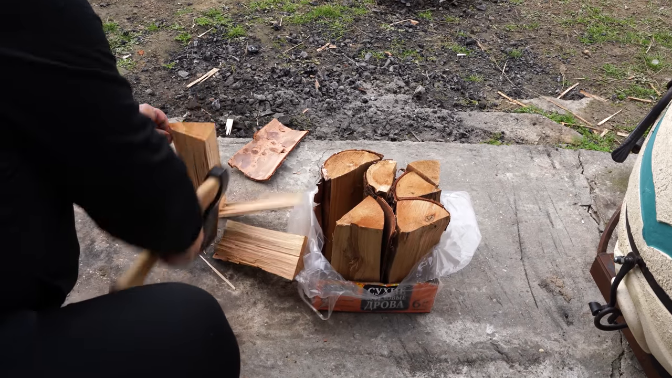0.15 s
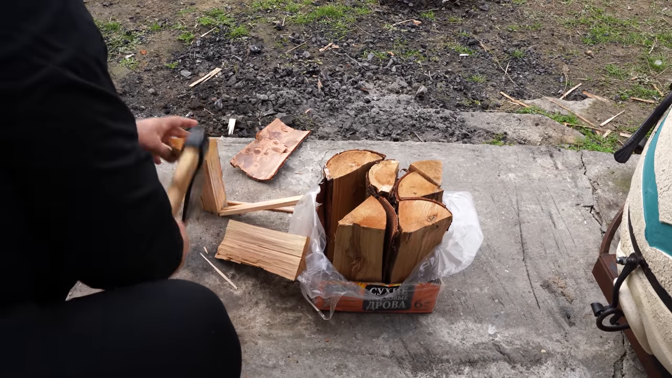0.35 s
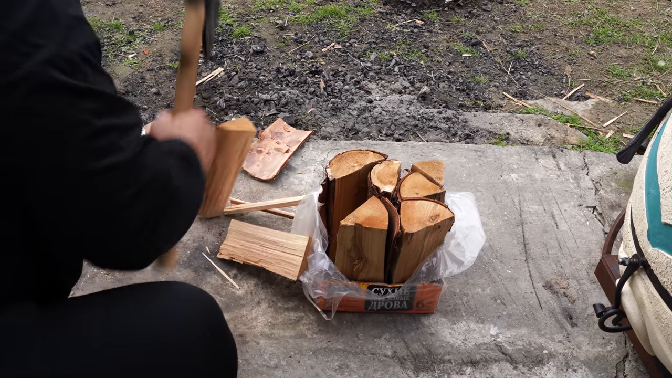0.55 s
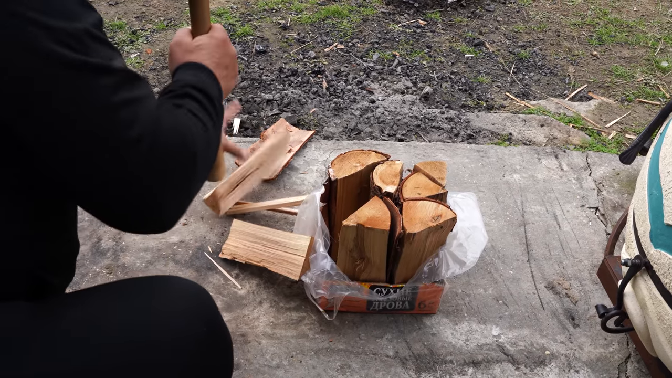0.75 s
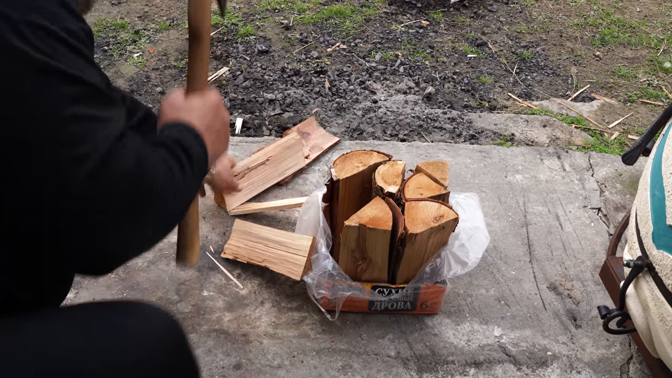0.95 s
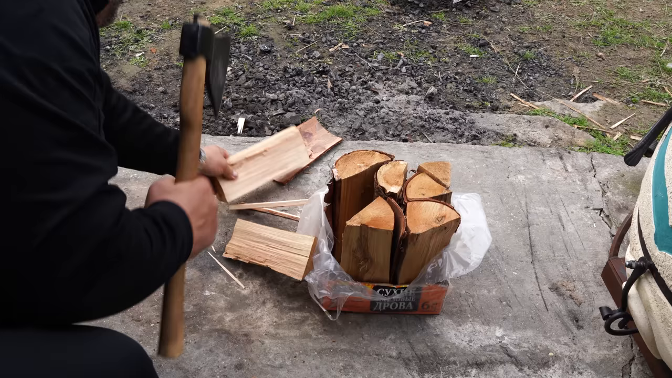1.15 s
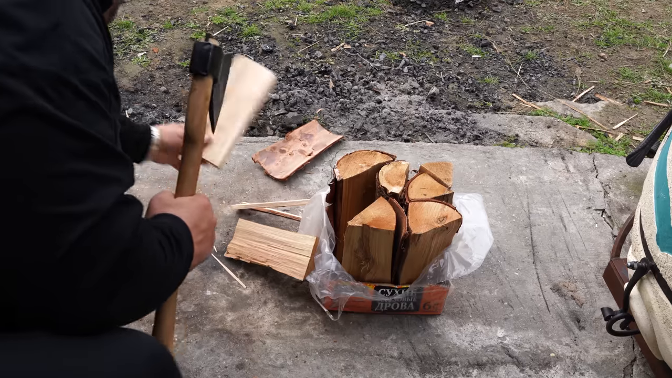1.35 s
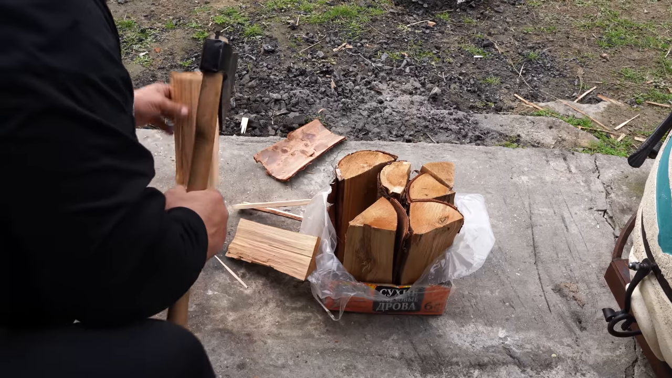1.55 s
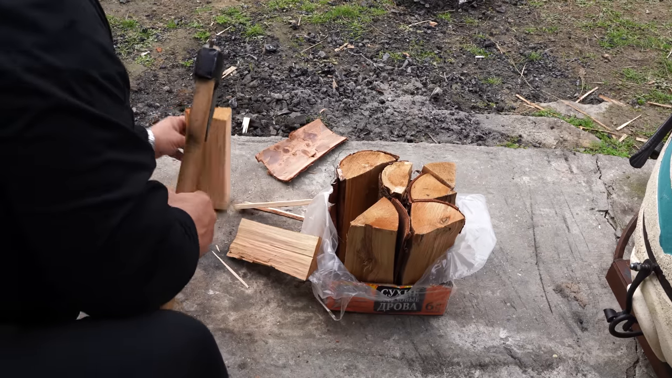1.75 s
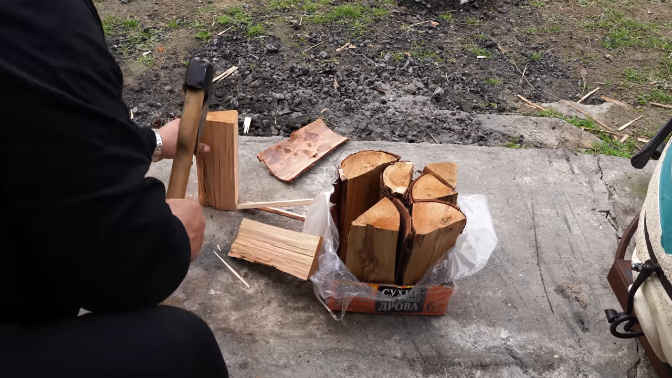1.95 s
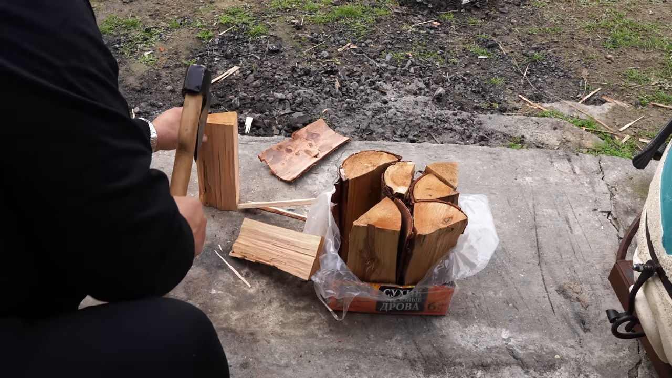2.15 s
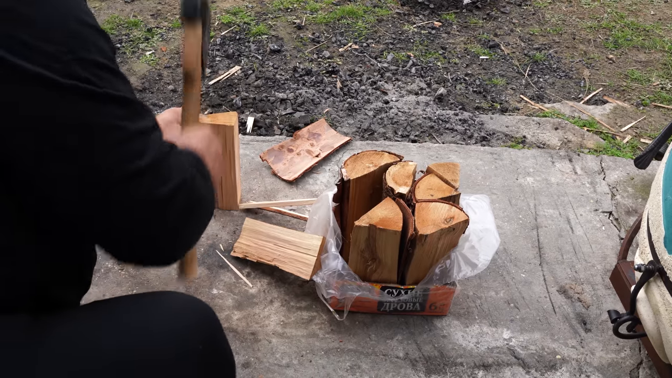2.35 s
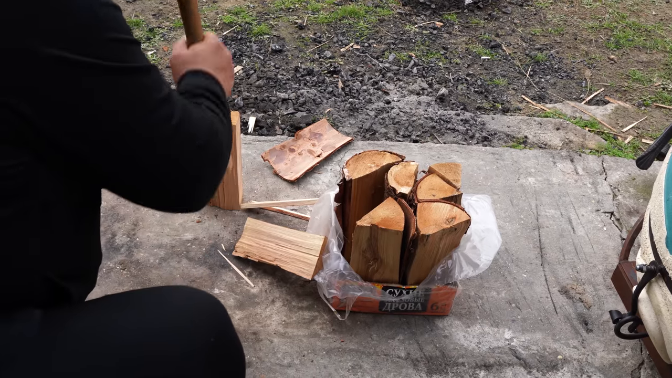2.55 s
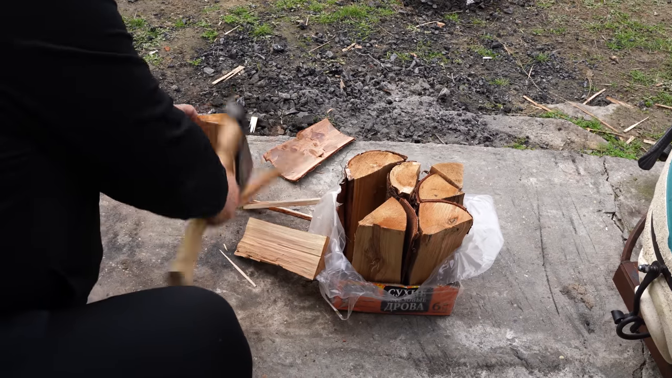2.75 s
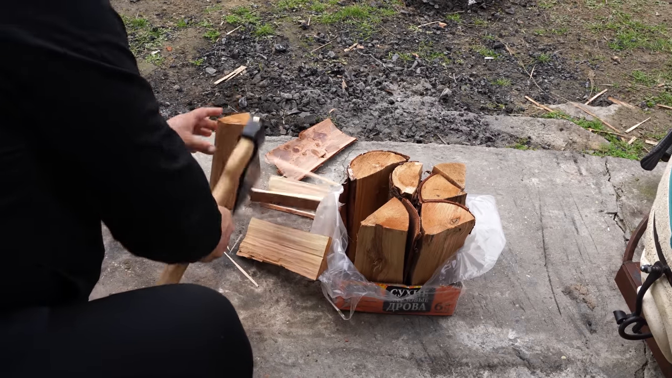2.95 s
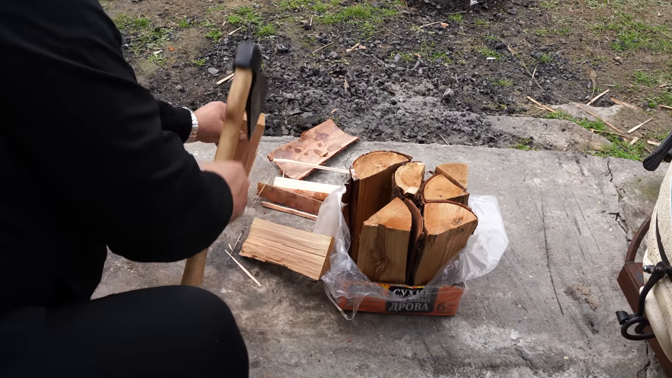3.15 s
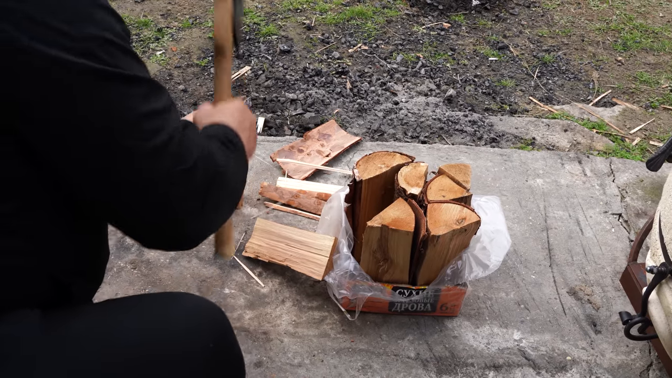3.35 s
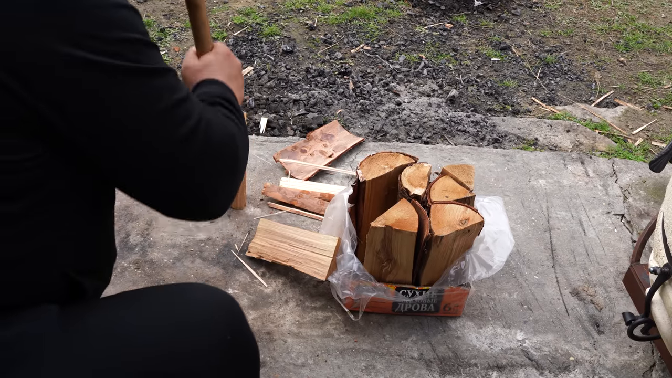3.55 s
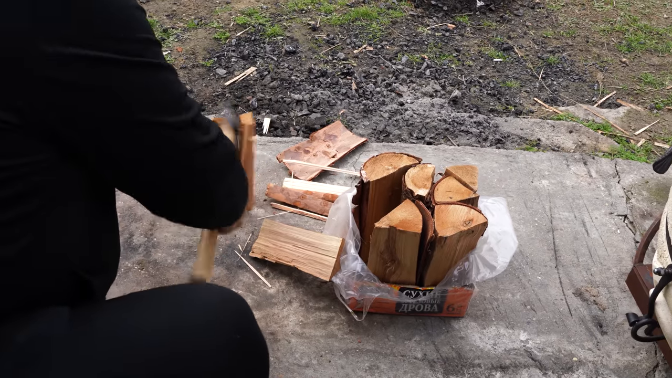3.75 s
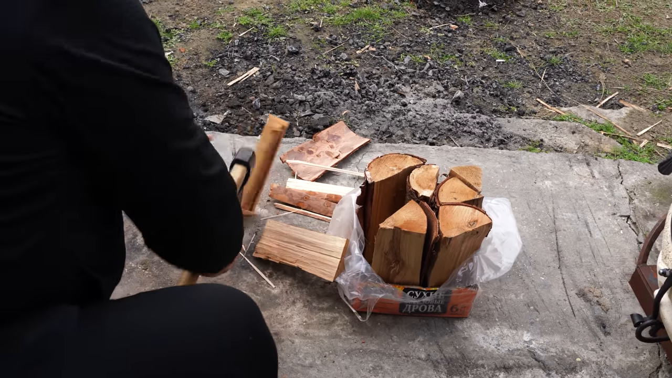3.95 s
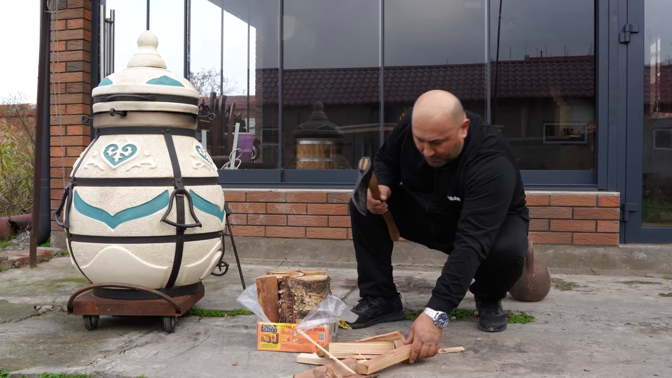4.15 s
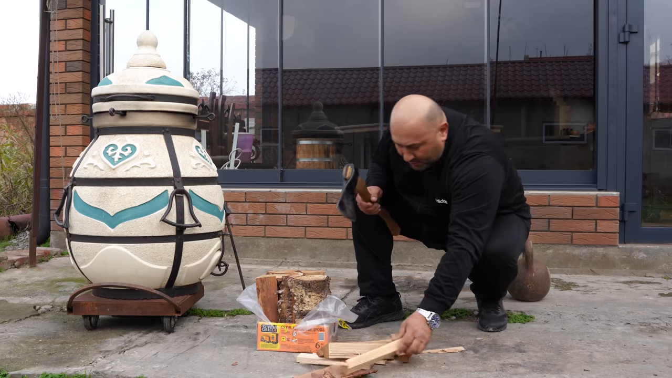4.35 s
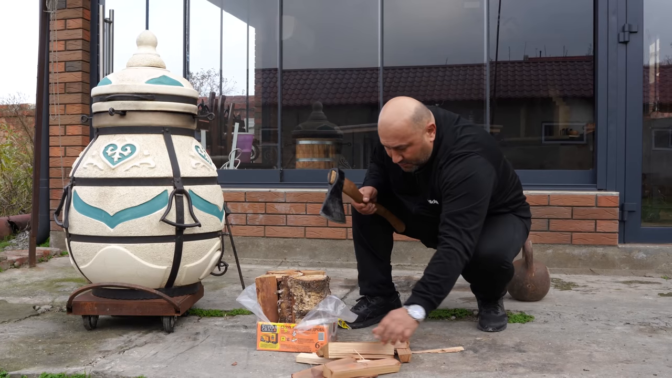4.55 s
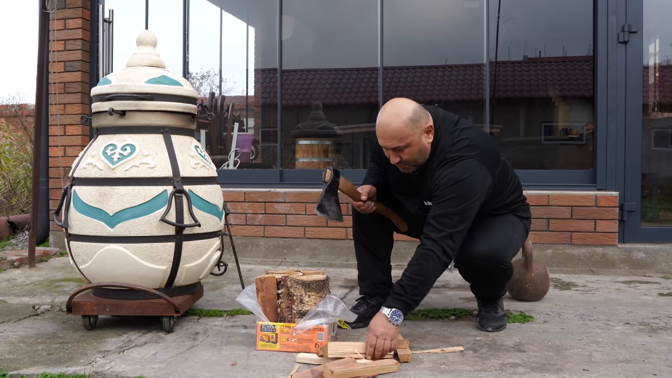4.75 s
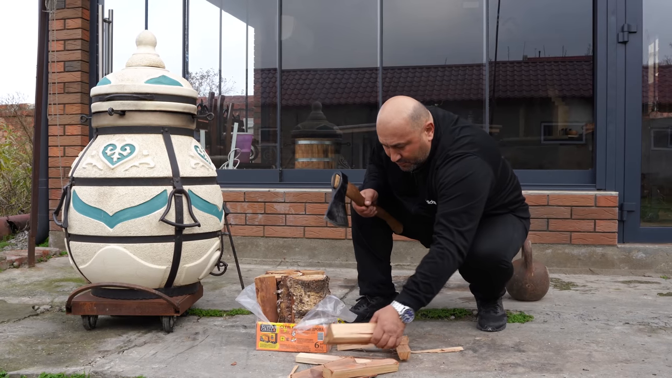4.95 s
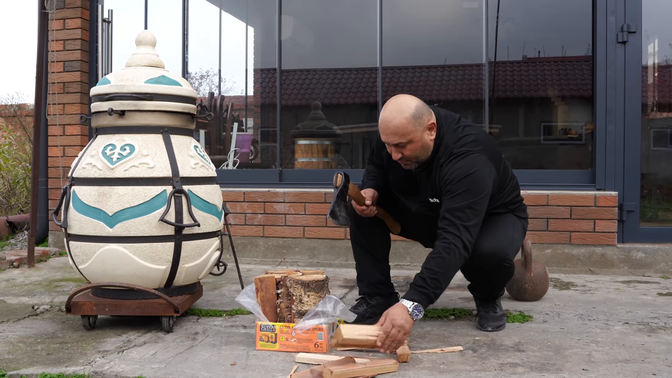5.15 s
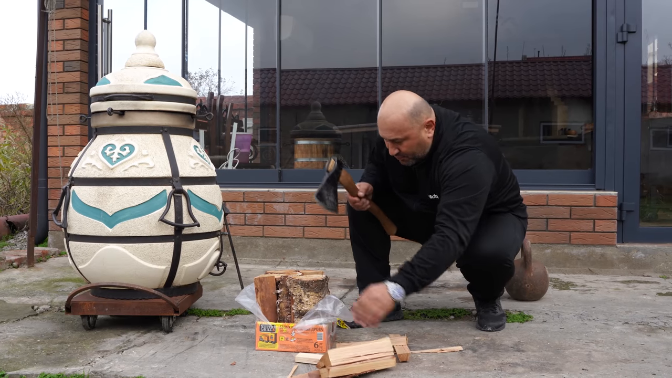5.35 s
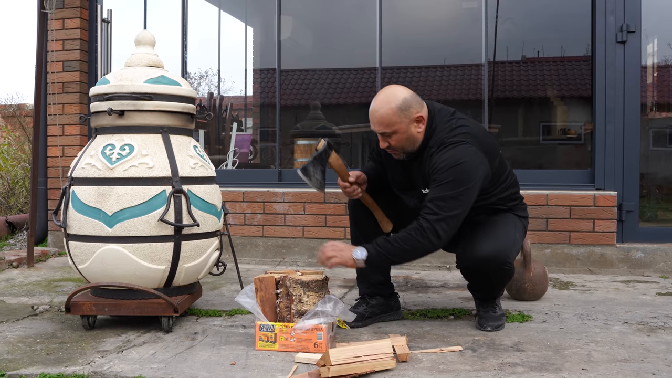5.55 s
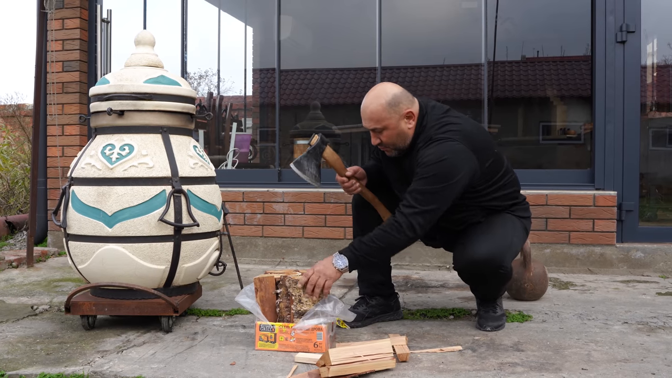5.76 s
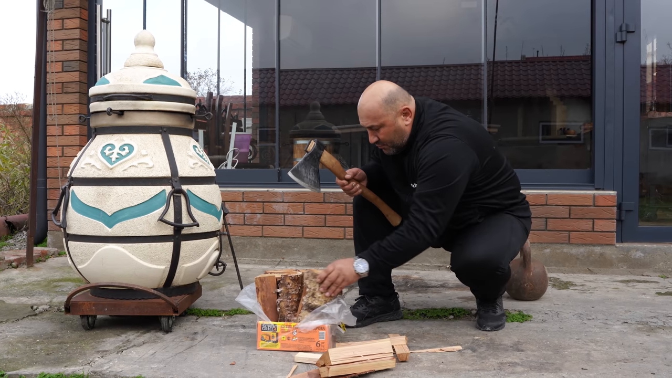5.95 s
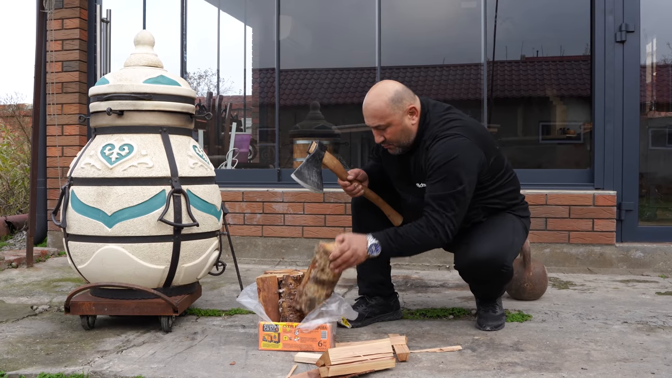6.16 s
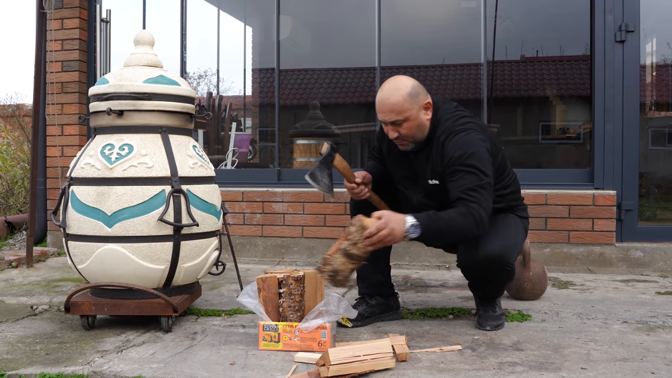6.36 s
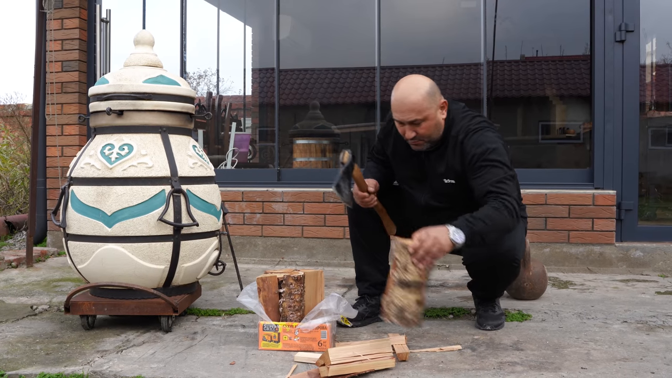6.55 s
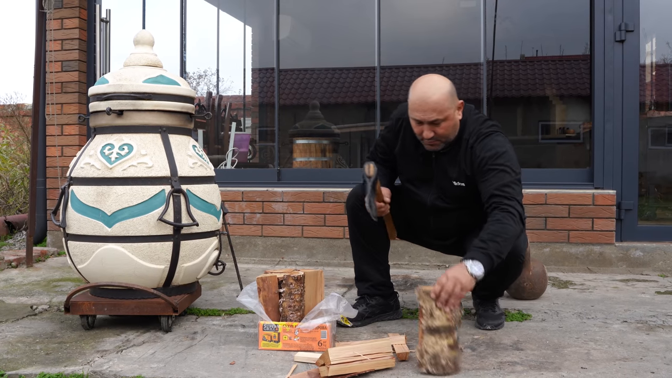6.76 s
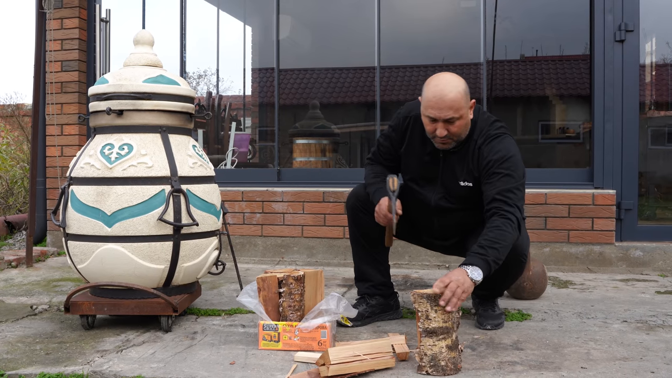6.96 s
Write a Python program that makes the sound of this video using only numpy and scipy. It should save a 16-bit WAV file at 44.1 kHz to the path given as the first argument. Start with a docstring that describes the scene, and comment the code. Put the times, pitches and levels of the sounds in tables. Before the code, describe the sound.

Three sharp hatchet chops split dry firewood on concrete, sticks clattering and steel ringing, then kindling is shuffled and a log pulled from crinkly plastic.

```python
"""A hatchet splits dry firewood on a concrete slab in a quiet yard, heard from close by.
Each chop is a noise crack with ringing wood, snapping fibres for the tear and dying sines for the steel head.
Split sticks clatter down as cracks with short bending modes; logs thud on the slab as dull pushes and low knocks.
Then the kindling is pushed together and a new log is drawn from its plastic bag, both in coloured crackle,
and stood on end. Quick reflections, a faint tail and a drifting wash of outdoor air place it in the yard."""
import sys
import numpy as np
from scipy import signal
from scipy.fft import rfft, irfft
from scipy.io import wavfile
from scipy.ndimage import uniform_filter1d

SR = 44100
rng = np.random.default_rng(int(sys.argv[2]) if len(sys.argv) > 2 else 0)


def transcribe(u):
    """Save the signal u as a 16-bit wav file named by the first command-line argument.

    u: samples, shape (n,) or (channels, n), limited to [-1, 1]; the rate is SR.
    q: integer samples, one column per channel.
    """
    v = np.clip(np.atleast_2d(u).T, -1, 1)
    q = np.round(v * 32767).astype(np.int16)
    wavfile.write(sys.argv[1], SR, q)


N = 308700
TIME = np.arange(N) / SR  # s

# spectrum of a dry crack, before hardness tilts it: f/Hz, level/dB
CRACK_SPECTRUM = [(40, -32.5), (100, -18.5), (220, 0), (600, 3), (1000, 3.5), (1500, 0), (2300, 1),
                  (3300, 2.5), (4000, -2.5), (4700, -16), (8000, -18), (16000, -29.5)]


def amp(db):
    """Turns dB into a linear gain."""
    return 10 ** (np.asarray(db) / 20)


def unit(x):
    """Scales to rms 1."""
    return x / np.sqrt(np.mean(x ** 2) + 1e-20)


def read(points, hz):
    """Reads a spectrum on a log-frequency axis."""
    f, value = np.transpose(points)
    return np.interp(np.log(hz + 1), np.log(f + 1), value)


def level(rows, axis=1):
    """Gain along a dB curve, silent outside it."""
    rows = np.array(rows)
    gain = amp(np.interp(TIME, rows[:, 0], rows[:, axis]))
    return gain * (TIME >= rows[0, 0]) * (TIME <= rows[-1, 0])


def add(mix, s, sound):
    """Adds a sound into the mix at s seconds, cut off at the end."""
    part = mix[round(s * SR):][:len(sound)]
    part += sound[:len(part)]


def colour(x, points):
    """Gives a long sound a spectrum, at rms 1."""
    gain = amp(read(points, np.fft.rfftfreq(len(x), 1 / SR)))
    return unit(irfft(rfft(x) * gain, len(x)))


def burst(db_at, t60, snap, size=8192):
    """One sharp push (its share is snap) and a dying puff of noise, with the spectrum db_at(Hz); starts near rms 1."""
    envelope = amp(-60 * np.arange(size) / SR / t60)
    energy_root = np.linalg.norm(envelope)
    drive = rng.standard_normal(size) * envelope
    drive[0] += snap * energy_root
    z = rfft(drive)
    z /= np.sqrt(uniform_filter1d(abs(z) ** 2, size=90) + 1e-12)  # even over wide bands, ragged in detail
    log_gain = np.log(amp(db_at(abs(np.fft.fftfreq(size, 1 / SR)))))
    # minimum phase: the spectrum is applied without sounding ahead of the push
    causal = np.exp(np.conj(signal.hilbert(log_gain)))[:len(z)]
    x = irfft(z * causal)[:size // 2]
    return x * energy_root / np.linalg.norm(x)


def ring(modes, length):
    """Dying sines of a struck body."""
    t = np.arange(int(length * SR)) / SR
    return sum(amp(db - 60 * t / t60) * np.sin(2 * np.pi * hz * t) for hz, db, t60 in modes)


def crackle(per_s, spread_db, hiss, count=12):
    """Random snaps of unequal size, each with one of several ragged colours, over a fine hiss."""
    grain_t60_s = 0.0032  # a single fibre or fold snaps this briefly
    size_db = np.minimum(spread_db * rng.exponential(1, N), 12)
    snaps = (rng.random(N) < per_s / SR) * rng.choice([-1, 1], N) * amp(size_db)
    kind = rng.integers(0, count, N)
    t = TIME[:SR // 100]
    grains = rng.standard_normal((count, len(t))) * amp(-60 * t / grain_t60_s)
    sound = sum(signal.oaconvolve(snaps * (kind == k), unit(grain))[:N] for k, grain in enumerate(grains))
    return unit(sound) + hiss * rng.standard_normal(N)


def clumps(per_s, depth_db):
    """A gain that catches and slips at random."""
    knots = np.arange(0, TIME[-1], 1 / per_s)
    heights = np.clip(rng.standard_normal(len(knots)), -2, 2)
    return unit(amp(depth_db * np.interp(TIME, knots, heights)))


def strokes(rows):
    """Gain of hand movements that each speed up and slow down in one arch."""
    shape = 0.45  # power of the sine arch
    out = np.zeros(N)
    for s, length, db in rows:
        arch = abs(np.sin(np.linspace(0, np.pi, int(length * SR))))
        add(out, s, amp(db) * arch ** shape)
    return out


def strike(db, hardness_db, t60, hz, ring_db, snap=0.37, rise_s=0.00033, twin=0.97, twin_db=-9.0,
           longest_t60=0.034):
    """A contact crack, then the wood rings in two bending modes, the second at twin times the pitch."""
    bass_share = 0.66  # a hard contact gains treble and loses this share of it in bass
    ring_cycles = 66  # the wood rings for this many cycles, unless longest_t60 is shorter
    tilt = [(500, -bass_share * hardness_db), (1500, 0), (3800, 0),
            (6000, 0.91 * hardness_db), (13000, 1.0 * hardness_db)]
    crack = amp(db) * burst(lambda f: read(CRACK_SPECTRUM, f) + read(tilt, f), t60, snap)
    ring_t60 = min(ring_cycles / hz, longest_t60)
    out = ring([(hz, ring_db, ring_t60), (hz * twin, ring_db + twin_db, ring_t60 / 2)], .2)
    rise = 1 - np.exp(-np.arange(len(crack)) / SR / rise_s)
    add(out, 0, crack * rise)
    return out


def air():
    """Steady distant wash that drifts a little; its colour changes within a moment at 4.12 s."""
    # relative spectra of the outdoor air before and after the change: f/Hz, level/dB
    garden_spectrum = [(30, -12), (60, -23), (92, 4), (135, -5.5), (165, -9.5), (260, -5), (640, -6),
                       (1000, -2), (2000, -12.5), (3900, -16.5), (5100, -32.5), (6500, -36.5), (11000, -49),
                       (16000, -56.5)]
    house_spectrum = [(25, -14), (85, -5.5), (165, -7), (195, -1.5), (225, -7.5), (380, -7), (640, -9),
                      (1000, -7.5), (2000, -14), (3900, -23.5), (5100, -42), (6500, -43.5), (11000, -49),
                      (16000, -47)]
    garden_db, house_db = -56.5, -54.5
    change_s, change_length_s = 4.12, 0.021
    changed = np.clip((TIME - change_s) / change_length_s, 0, 1)
    garden = amp(garden_db) * colour(rng.standard_normal(N), garden_spectrum)
    house = amp(house_db) * colour(rng.standard_normal(N), house_spectrum)
    drift = clumps(7, .4)
    return (garden * np.sqrt(1 - changed) + house * np.sqrt(changed)) * drift


def yard(x, near_db=-13, near_t60=0.091, far_db=-21, far_rise_s=0.011):
    """Quick reflections off slab and wall, then a faint tail from the buildings around."""
    # decay of the far tail: f/Hz, t60/s
    tail_decay = [(100, .6), (400, 0.63), (1200, 0.89), (3500, 0.96), (7000, 1), (15000, 0.52)]
    t = np.arange(SR) / SR
    echoes = rng.standard_normal(SR) * (rng.random(SR) < .05)  # sparse
    near = echoes * amp(-60 * t / near_t60) * (t > .004)
    hz, frame_s, z = signal.stft(rng.standard_normal(SR), SR, nperseg=256)
    decay = amp(-60 * frame_s / read(tail_decay, hz)[:, None])
    far = signal.istft(z * decay, SR, nperseg=256)[1][:SR]
    far = far * np.minimum(t / far_rise_s, 1)
    response = amp(near_db) * near / np.linalg.norm(near) + amp(far_db) * far / np.linalg.norm(far)
    return x + signal.fftconvolve(x, response)[:N]


def grit(floor_db=-82):
    """Splinters and grit rasp faintly under hands and shoes."""
    # a hand and sleeve brush over splintered wood: t/s, length/s, level/dB
    brushes = [(.28, 0.36, -81), (.78, 0.26, -58), (1.08, 0.17, -67), (1.55, 0.46, -76), (2.04, 0.21, -72),
               (5.16, 0.15, -74), (6.28, 0.23, -82)]
    rasp = crackle(300, 4, .3) * clumps(50, 5)
    rasp = colour(rasp, [(1000, -13.5), (3500, 8.5), (5000, -3.0), (9000, -7.5), (16000, -9)])
    return rasp * (amp(floor_db) + strokes(brushes))


def handling(crinkle_db=1, rub_db=1):
    """Rough wood catches and slips on wood; the plastic bag crinkles as a log rubs out of it."""
    # sticks slide over each other: t/s, length/s, level/dB
    slides = [(.92, 0.11, -61), (1.135, 0.045, -57), (4.41, 0.12, -51), (4.53, .14, -48.5),
              (4.74, 0.092, -55.5), (4.87, 0.053, -56.5), (4.95, 0.081, -59)]
    # a log is drawn from the bag: t/s, crinkle level/dB and rub level/dB (crinkle_db and rub_db add to them)
    draw = [(5.79, -67.5, -65), (6.012, -45.5, -48), (6.034, -52, -56), (6.068, -48, -56),
            (6.094, -47.5, -41.5), (6.178, -46.5, -51), (6.216, -49.5, -52), (6.312, -78.5, -70),
            (6.32, -74, -66)]
    # relative spectra of wood sliding, plastic crinkling and wood rubbing: f/Hz, level/dB
    slide_spectrum = [(530, -4), (900, -3.5), (1150, -53), (1310, 2), (1530, -14), (1850, -5.5), (3960, -5),
                      (4360, -25.5), (7400, -16.5), (16000, -25)]
    crinkle_spectrum = [(530, -28), (900, -9), (1130, 0), (1390, 4), (2220, 1.5), (3590, 3.5),
                        (4980, -12.5), (9420, -13), (16000, -16)]
    rub_spectrum = [(88, -31), (150, -7.5), (455, 2.5), (528, -2.5), (584, -0.5), (731, -3), (1100, -18),
                    (1430, -45), (2420, -120)]
    catches = crackle(700, 5, .35) * clumps(80, 4)
    folds = crackle(1100, 4.5, .4) * clumps(70, 2.5)
    slide = colour(catches, slide_spectrum) * strokes(slides)
    crinkle = amp(crinkle_db) * colour(folds, crinkle_spectrum)
    rub = amp(rub_db) * colour(crackle(400, 0.94, 0.79), rub_spectrum)
    return slide + crinkle * level(draw) + rub * level(draw, axis=2)


def thuds():
    """End grain on concrete: a dull push with a short low knock."""
    # a log end meets the slab: t/s, push level/dB, pitch f/Hz, brightness/dB per octave (well above
    # the pitch), push t60/s, knock level/dB
    landings = [(0.333, -30.5, 310, -10.5, 0.022, -33.5), (1.918, -29.5, 320, -2, 0.0246, -36),
                (3.8851, -10, 300, -0.5, 0.035, -11), (3.96, -39.5, 373, -6, 0.11, -39),
                (6.8519, -27, 320, 1, 0.043, -21), (6.862, -24, 417, -5.5, 0.039, -30.5),
                (6.92, -49.5, 403, 2, 0.35, -51)]
    # spectrum of the push, before its brightness: f/Hz, level/dB
    push_spectrum = [(40, -50.5), (100, -14), (200, -0.5), (330, -1), (750, -2), (1200, -13.5),
                     (2200, -26.5), (3700, -24), (5000, -44), (16000, -50)]
    # a log standing on concrete knocks in a few short modes: multiple of its pitch, level/dB, t60/s
    log_modes = [(0.999, -3, 0.085), (1.35, -44.5, 0.024), (1.9, -9.5, 0.017), (2.35, -15.5, 0.058)]
    out = np.zeros(N)
    for s, db, hz, bright_db, t60, knock_db in landings:
        push = burst(lambda f: read(push_spectrum, f) + bright_db * np.log2(1 + f / hz), t60, snap=0.35)
        knock = ring([(hz * ratio, mode_db, mode_t60) for ratio, mode_db, mode_t60 in log_modes], .2)
        add(out, s, amp(db) * push)
        add(out, s, amp(knock_db) * knock)
    return out


def thin_stick():
    """Every bounce rings the same few modes, as strongly as a dry crack excites them."""
    # thin sticks are knocked and sing: t/s, level/dB, pitch as a multiple of the modes
    bounces = [(2.877, -30.5, 1), (2.9089, -23.5, 1), (2.985, -39, 1), (3.066, -37, 1), (3.152, -41.5, 1),
               (4.427, -44, .875), (4.4586, -39, 1.213), (4.4989, -40, .875), (5.029, -51, .89)]
    # modes at pitch 1, before the crack excites them: f/Hz, level/dB, t60/s
    stick_modes = [(1512, 3, .095), (2040, -11, 0.065), (3020, -13.5, 0.063), (3720, -9.5, .07),
                   (4100, -14.5, 0.11)]
    out = np.zeros(N)
    for s, db, ratio in bounces:
        modes = [(hz * ratio, mode_db + read(CRACK_SPECTRUM, hz * ratio), t60)
                 for hz, mode_db, t60 in stick_modes]
        add(out, s, amp(db) * ring(modes, 0.43))
    return out


def drops(pitch_spread=0.1):
    """A dropped piece rocks from end to end in ever quicker contacts, each a little different in pitch."""
    # a piece is let go and rattles to rest: t/s, level/dB, hardness/dB, first gap/s, middle stick pitch f/Hz
    falls = [(0.84, -23.5, 1, 0.0096, 1570), (3.0522, -29, 5, .013, 2810), (4.5544, -40, 2, 0.016, 2500),
             (5.3265, -25.5, 7, .0066, 2350), (5.4346, -37, -0.5, 0.017, 1940)]
    # one corner touches, the far end slaps down, two rebounds follow: level/dB on top of the fall's
    contacts = [-1, 0.5, -3.5, -9.5]
    rebound = 0.83  # each gap is this share of the last
    crack_t60_s, ring_db = 0.028, -5  # ring against crack
    out = np.zeros(N)
    for s, db, hardness_db, gap, hz in falls:
        for k, contact_db in enumerate(contacts):
            pitch = hz * np.exp(pitch_spread * rng.standard_normal())
            hit_db = db + contact_db
            add(out, s, strike(hit_db, hardness_db, crack_t60_s, pitch, hit_db + ring_db))
            s = s + gap * rebound ** k
    return out


def splinters(pitch_spread=.08):
    """Thin splinters break with a short bright snap."""
    # a last splinter snaps: t/s, level/dB
    snaps = [(0.235, -25), (0.3152, -42), (.6735, -48), (1.2982, -47), (1.4208, -46), (3.2545, -51.5),
             (3.7767, -12.5), (3.8297, -24), (3.851, -23), (3.862, -17.5), (3.934, -31.5), (4.025, -36),
             (4.1492, -29)]
    hardness_db, t60_s, middle_hz, ring_db = 16, 0.021, 3855, -0.5  # ring against crack
    out = np.zeros(N)
    for s, db in snaps:
        pitch = middle_hz * np.exp(pitch_spread * rng.standard_normal())
        add(out, s, strike(db, hardness_db, t60_s, pitch, db + ring_db))
    return out


def clacks():
    """Single knocks of loose wood: a crack and a short ring each."""
    # wood strikes wood or concrete once: t/s, crack level/dB, hardness/dB, crack t60/s, stick pitch f/Hz,
    # ring level/dB
    knocks = [(0.09, -19, -6, .04, 566, -24), (.1103, -6.5, 12.5, 0.0055, 3200, -12.5),
              (0.1203, -19, 2.5, 0.044, 1030, -34), (0.133, -14.5, 16.5, 0.018, 3620, -8),
              (0.1596, -26, 0.5, 0.043, 3510, -13), (0.223, -27, 8, 0.018, 3420, -49),
              (0.465, -20, 5, 0.021, 2240, -22), (.794, -49.5, 8, 0.049, 1940, -43),
              (0.819, -37.5, -7, 0.042, 1800, -40), (0.874, -33, -4, 0.047, 1270, -31.5),
              (0.9252, -31.5, -1, .012, 3500, -57), (.942, -41.5, -10, 0.094, 1790, -51),
              (0.9735, -28.5, 1.5, 0.027, 3790, -31), (1.0164, -33.5, 13.5, 0.014, 3950, -35),
              (1.1178, -44.5, 12, .06, 2980, -41.5), (1.157, -48, -1, 0.2, 3260, -42),
              (1.5848, -45.5, 5, 0.026, 2180, -47), (1.8708, -40, -6, 0.024, 1240, -43),
              (2.7883, -5, -5, 0.01, 2040, -14), (2.817, -28.5, 5.5, 0.062, 3733, -20.5),
              (2.876, -16, 3, 0.017, 3762, -9.5), (2.9071, -10, 1, 0.025, 3520, -6.5),
              (3.066, -24, -1.5, 0.022, 3375, -31.5), (3.1507, -37, -1.5, 0.058, 917, -41),
              (3.1977, -41.5, 0.5, 0.076, 2250, -42.5), (4.3375, -46.5, 4, 0.045, 1870, -40.5),
              (4.3765, -41, 7.5, 0.026, 2910, -34.5), (4.6101, -37, -5, 0.036, 2370, -33),
              (4.8016, -38.5, 6, 0.028, 2470, -43.5), (5.31, -40.5, -3, 0.054, 2050, -44),
              (5.347, -32.5, 1, 0.075, 1820, -40)]
    out = np.zeros(N)
    for s, db, hardness_db, t60, hz, ring_db in knocks:
        add(out, s, strike(db, hardness_db, t60, hz, ring_db))
    return out


def hatchet_head(damp_s=.015):
    """The steel sings until it is touched; its lowest mode swells and fades as the blade turns."""
    # the head is set ringing: t/s, level/dB, length/s, damping by the grip/dB per s, overtone level/dB
    # on top of the first, first edge-on moment/s
    rings = [(0.081, -35, 1.7, -0.5, 8, 0.2), (2.773, -29, 0.11, 19.5, -22, 4.3),
             (2.916, -51, .4, 29.5, -11, 2), (3.772, -32.5, 0.13, 30.5, -7, 4.4),
             (3.873, -23, 0.37, 55, -29, 3.88)]
    # lowest bending mode, then the higher ones, before the grip damps them: f/Hz, level/dB, t60/s
    lowest_mode = [(3015, -0.5, 1.9)]
    overtones = [(6150, -27, .5), (6480, -20, .35), (10100, -26.5, .75), (9600, -20, .6),
                 (14290, -29.5, .8), (15000, -29.5, .5)]
    # one faint metallic ting: f/Hz, level/dB, t60/s
    ting_modes = [(8150, -57, 0.2), (8240, -56, 0.2)]
    ting_s = 1.118
    half_turn_s, edge_on_share = .152, .17  # the blade is quietest edge-on, once in every half turn
    out = np.zeros(N)
    for s, db, length, grip_db_per_s, overtone_db, edge_on_s in rings:
        t = np.arange(int(length * SR)) / SR
        touched = np.minimum((length - t) / damp_s, 1)
        envelope = amp(db - grip_db_per_s * t) * touched
        facing = np.hypot(np.sin(np.pi * (s + t - edge_on_s) / half_turn_s), edge_on_share)
        singing = facing * ring(lowest_mode, length) + amp(overtone_db) * ring(overtones, length)
        add(out, s, envelope * singing)
    add(out, ting_s, ring(ting_modes, .3))
    return out


def cleft(hz):
    """The two halves ring like a fork, sinking in pitch as the split runs deeper."""
    sharp, settle_s, t60_s = 0.11, 0.0056, 0.12  # starts this share sharp and sinks to its pitch
    t = np.arange(SR // 3) / SR
    turns = np.cumsum(hz * (1 + sharp * np.exp(-t / settle_s))) / SR
    return amp(-60 * t / t60_s) * np.sin(2 * np.pi * turns)


def chops():
    """The blade cracks into the log; fibres snap in quick clumps that drop sharply once the halves part, and
    chips patter down."""
    # the blade bites: t/s, crack level/dB, hardness/dB, crack t60/s, log pitch f/Hz, ring level/dB,
    # tearing level/dB, time until the halves part/s, cleft pitch f/Hz, cleft level/dB
    bites = [(0.0831, -3.5, 2, 0.022, 999, -3.5, -27, 0.053, 2113, -26),
             (2.7615, 7, 2, 0.012, 970, -10.5, -28, 0.13, 2050, -30.5),
             (3.7743, -1.5, -3, 0.016, 3200, -3.5, -26, 0.11, 1805, -12.5)]
    # relative spectrum of tearing fibres: f/Hz, level/dB
    tear_spectrum = [(59, -27), (100, -8.5), (1330, -16), (1830, -7.5), (2220, -10.5), (3320, -5),
                     (5190, -18), (7450, -21), (9020, -18), (10200, -30), (15000, -23), (16000, -34)]
    # tearing dies away, and drops once the halves part
    tear_fade_db_per_s, parted_drop_db, parting_s = 81, 12, .015
    chips_per_s, chips_db, chips_fade_db_per_s = 21, -64.5, 24.5
    out, tearing, falling = np.zeros((3, N))
    for s, db, hardness_db, t60, hz, ring_db, tear_db, split_s, cleft_hz, cleft_db in bites:
        bite = strike(db, hardness_db, t60, hz, ring_db, snap=1.0, rise_s=0.0015,
                      twin=1.0, twin_db=-1, longest_t60=0.0061)
        add(out, s, bite)
        add(out, s, amp(cleft_db) * cleft(cleft_hz))
        parted = np.clip((TIME - split_s) / parting_s, 0, 1)
        add(tearing, s, amp(tear_db - tear_fade_db_per_s * TIME - parted_drop_db * parted))
        add(falling, s, amp(chips_db - chips_fade_db_per_s * TIME))
    fibres = crackle(1500, 4, .3) * clumps(260, 4)
    chips = crackle(chips_per_s, 4, 0)
    chips = colour(chips, [(1000, -19.5), (3500, -1), (5500, -2), (9000, -0.5), (16000, -9.5)])
    return out + colour(fibres, tear_spectrum) * tearing + chips * falling


def scene():
    """Wood sounds in the yard, with the steel head and the air added without reflections."""
    wood = chops() + clacks() + drops() + splinters() + thuds() + thin_stick() + handling() + grit()
    return (yard(wood) + hatchet_head() + air())[None]


def record(dry, low_cut_hz=58, order=4, high_cut_hz=16200):
    """The loudest cracks overload softly and the recorder sheds deep bass; then the band limit."""
    ceiling = .78
    squashed = ceiling * np.tanh(dry / ceiling)
    bass_cut = signal.butter(order, low_cut_hz, "highpass", fs=SR, output="sos")
    lean = signal.sosfilt(bass_cut, squashed)
    band_limit = signal.firwin(401, high_cut_hz, window=("kaiser", 9), fs=SR)
    return signal.oaconvolve(lean, band_limit[None], "same")


dry = scene()
out = record(dry)
transcribe(out)
```